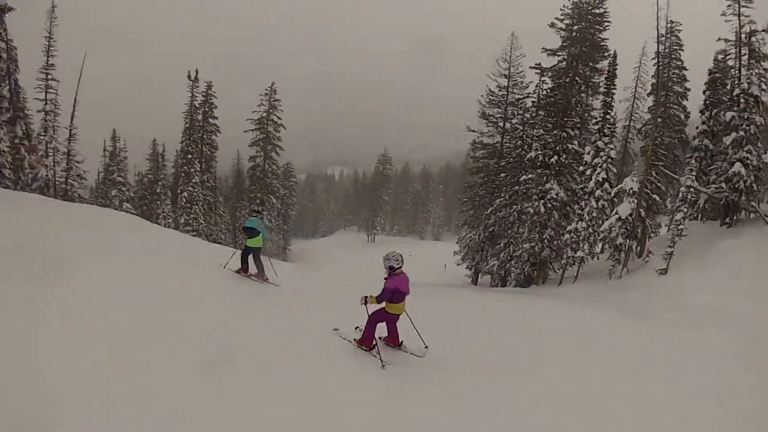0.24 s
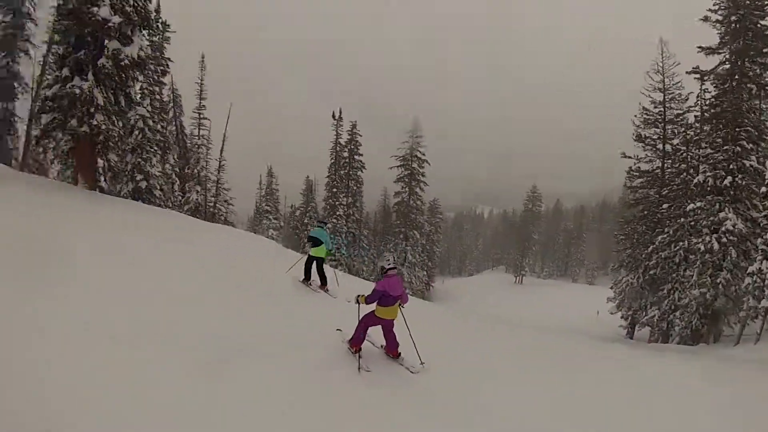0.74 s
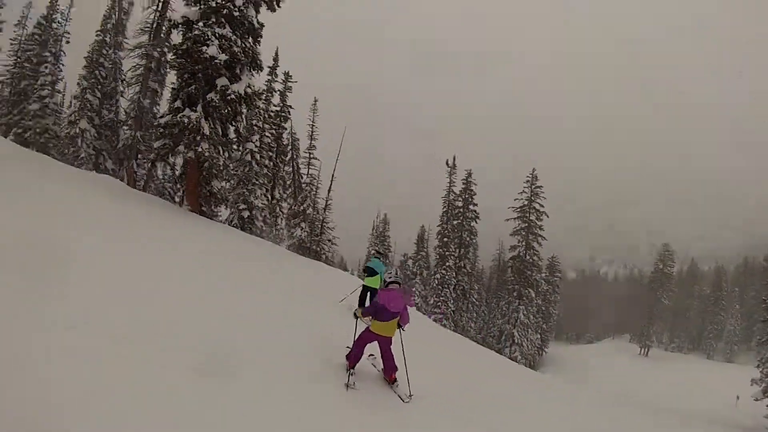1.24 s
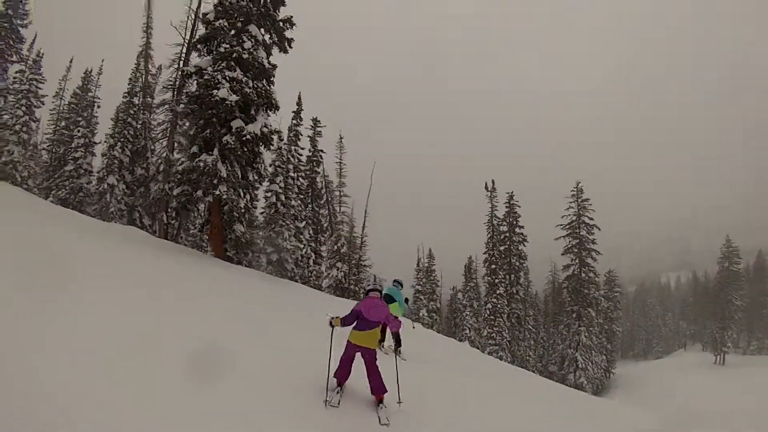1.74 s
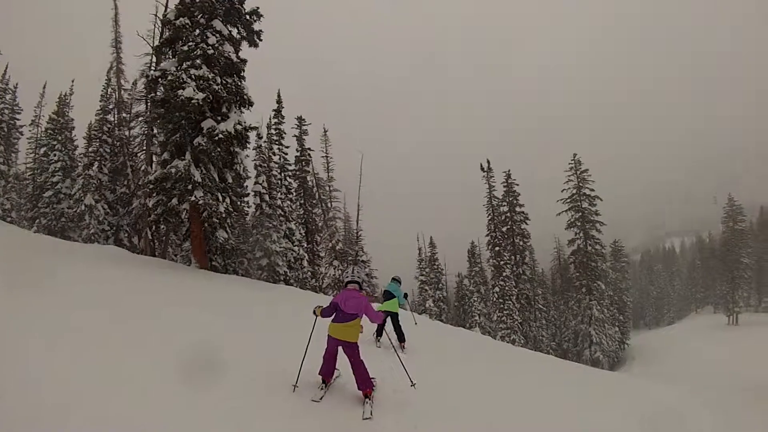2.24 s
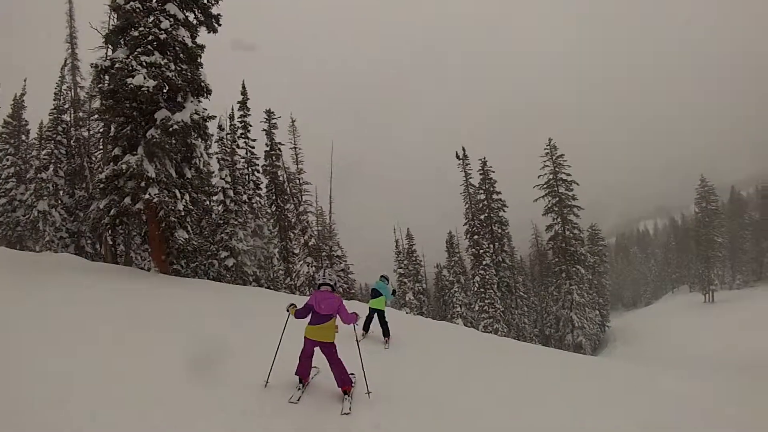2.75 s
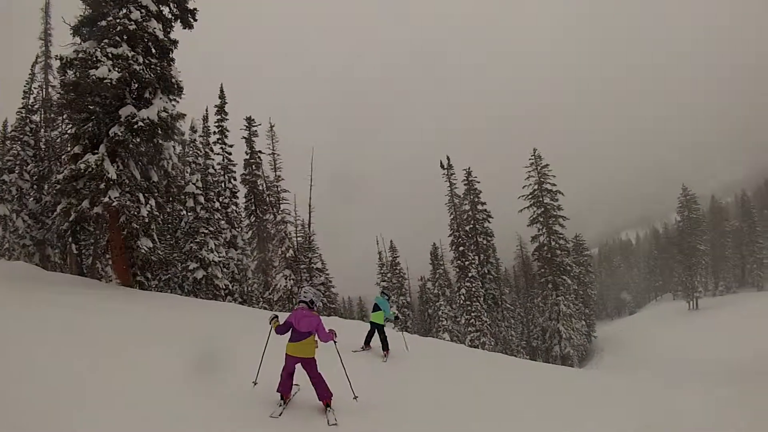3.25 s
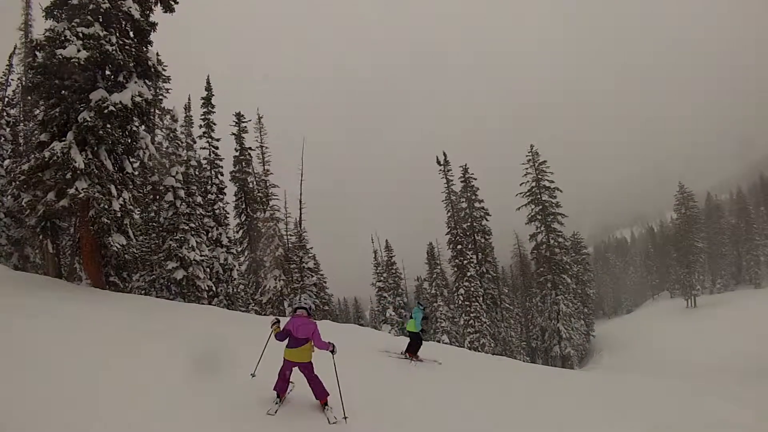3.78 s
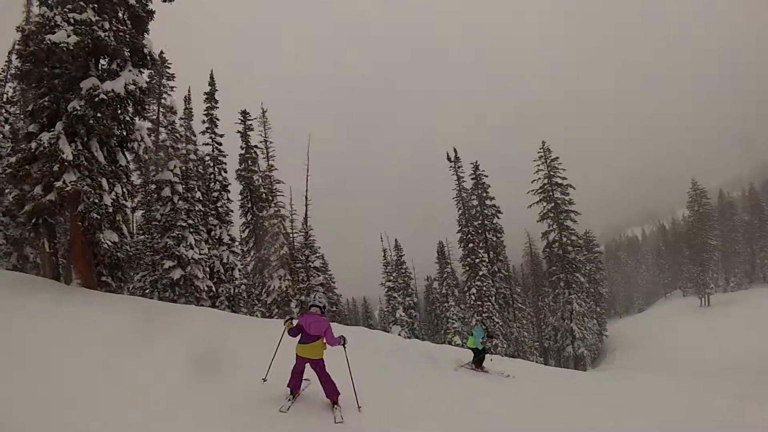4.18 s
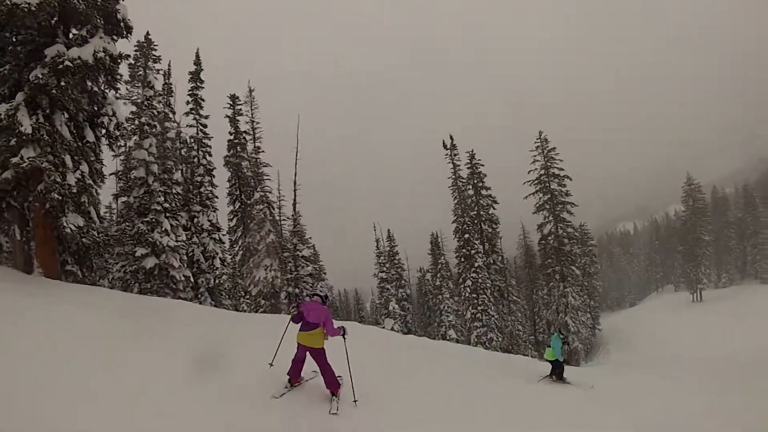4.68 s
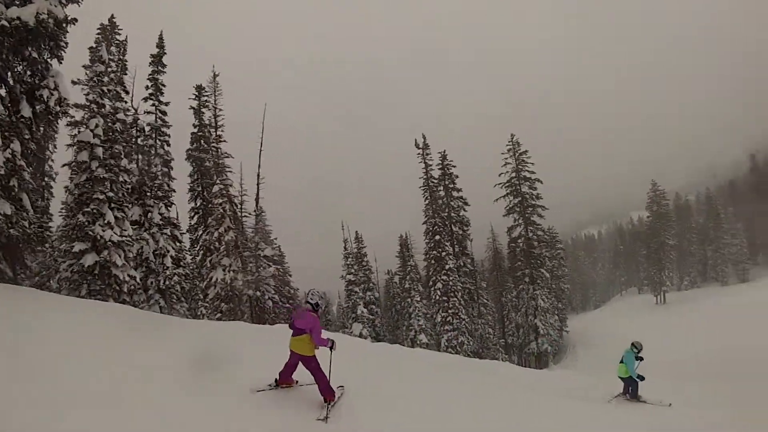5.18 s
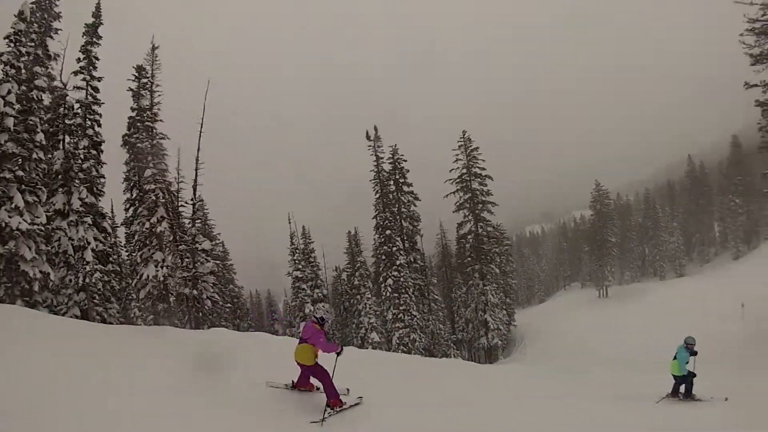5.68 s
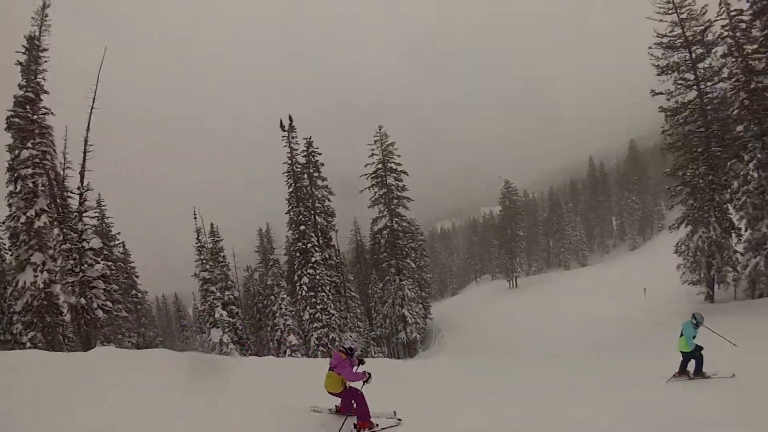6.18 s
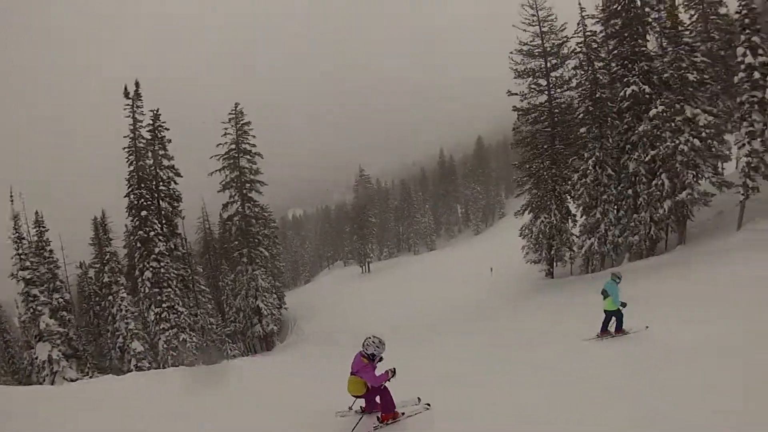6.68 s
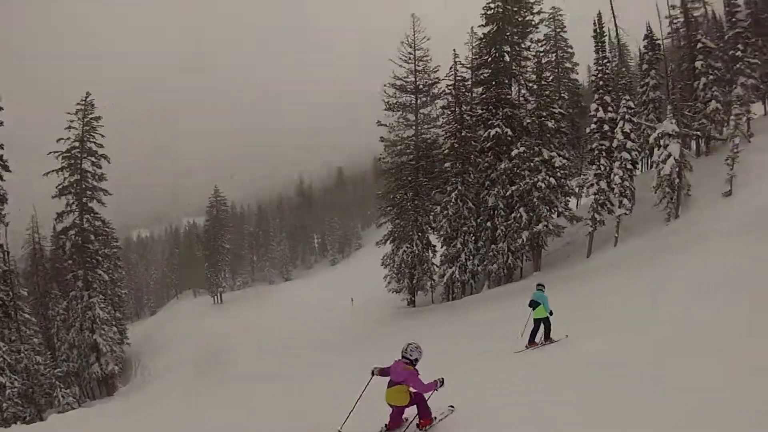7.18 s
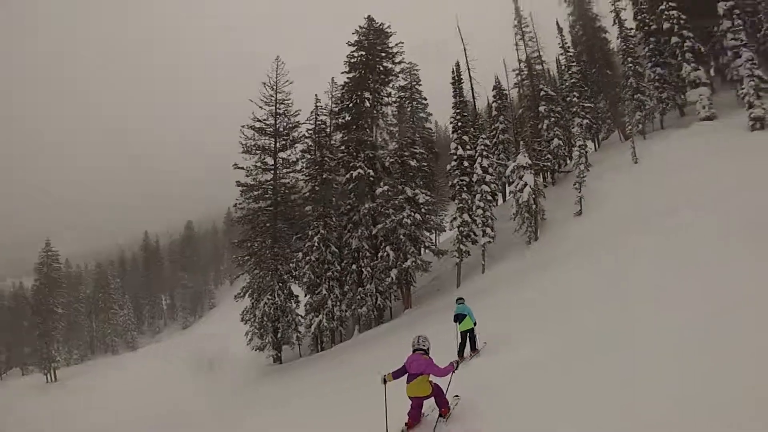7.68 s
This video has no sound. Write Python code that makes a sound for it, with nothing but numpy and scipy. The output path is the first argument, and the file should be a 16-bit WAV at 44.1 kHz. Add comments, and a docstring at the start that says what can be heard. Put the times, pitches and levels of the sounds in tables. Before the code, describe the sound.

Skis swish softly through powder snow in two turns, with sparse icy ticks, dull mount knocks and a low rumble, heard close and muffled.

```python
"""Slow powder skiing in snowfall

Heard close, from a camera in a closed plastic housing: snow sheared by the skis swishes, stronger in two turns,
as noise through the housing's resonances. Short bursts of ringing noise are the crunches of packed snow.
Grains tick and gear clacks by ringing a few modes; the mount knocks dully and its hardest knocks rock the camera.
Low noise makes the rumble of the ride and the air on the shell, over a faint steady hiss."""
import sys
import numpy as np
from scipy import signal
from scipy.fft import rfft, irfft
from scipy.io import wavfile
from scipy.ndimage import uniform_filter1d

SR = 44100
rng = np.random.default_rng(int(sys.argv[2]) if len(sys.argv) > 2 else 0)


def store_pcm(level_fs):
    """Save levels as 16-bit WAV."""
    pcm = np.round(np.clip(level_fs, -1, 1) * 32767).astype(np.int16)
    wavfile.write(sys.argv[1], SR, np.atleast_2d(pcm).T)


N = 349713
TIME = np.arange(N) / SR
FREQS = np.fft.rfftfreq(N, 1 / SR)

# Turns, in which the edges bite and hold; levels before the swish's own law:
# start_s, bite_s, hold_s, release_s, level_db, change over the hold_db
TURNS = [(0.512, 0.059, 0.88, 1, -64.5, -0.5), (7.16, 0.41, 0.35, 0.5, -57, 0.5)]
# Steady glide under the turns, before the swish's own law: time_s, level_db
GLIDE = [(0, -68.3), (2.4, -67), (2.63, -73), (2.8, -68.5), (4.1, -70.5), (5.4, -68.5), (7.1, -65.5)]
# Resonances of the closed housing: pitch_hz, nominal width_hz, level_db
HOUSING = [(1270, 62, -3), (1472, 205, 2), (1629, 120, -1), (1928, 88, -1), (2117, 420, -7),
           (2528, 255, -4), (3670, 56, -6), (4724, 1260, -11), (5350, 370, -12), (6660, 1250, -16.5),
           (8600, 2640, -17.5), (11350, 540, -27)]
# Broad leak through the housing wall: pitch_hz, level_db
WALL = [(100, -11.5), (300, -8.5), (550, -11), (780, -11), (980, -16.5), (1150, -8), (1800, -14.5),
        (2700, -8.5), (3000, -13.5), (5000, -25), (6000, -26.5), (10000, -38), (12800, -25.5), (15000, -42)]
# Resonance rung by thrown spray: pitch_hz, width_hz
SPRAY = (4590, 510)
# Crunches of packed snow under a ski: start_s, relative level_db, nominal length_s
CRUNCHES = [(0.593, -52.5, 0.055), (5.117, -50.5, 0.019), (5.766, -58, 0.016), (5.926, -53, 0.017),
            (6.098, -55, 0.023), (6.73, -52.5, 0.017), (6.763, -61, 0.018), (6.83, -58, 0.028),
            (6.903, -62, 0.03), (6.92, -48, 0.024), (6.958, -56, 0.013), (7.015, -45, 0.0096),
            (7.74, -47.5, 0.027)]
# Icy grains striking the shell: start_s, energy_db, brightest pitch_hz
TICKS = [(0.2183, -33.5, 6000), (0.318, -36, 4500), (1.1755, -34.5, 12000), (1.4109, -25, 5500),
         (1.742, -31.5, 8000), (1.7986, -33.5, 9500), (2.4522, -34, 13000), (2.497, -36.5, 7000),
         (2.5842, -31, 3220), (2.8662, -34.5, 2800), (3.15, -30.5, 3820), (3.3465, -34.5, 7000),
         (4.196, -35.5, 5500), (4.276, -35, 4200), (4.507, -33.5, 3200), (4.542, -34.5, 12000),
         (4.7554, -32, 5900), (4.9789, -32.5, 4500), (5.1217, -31.5, 8000), (5.1356, -17, 4970),
         (5.1987, -22, 3580), (5.3509, -23.5, 9500), (5.4414, -23, 9500), (5.4835, -29, 5500),
         (5.6952, -32, 7600), (5.7269, -28.5, 6000), (5.7552, -32, 4500), (5.819, -29, 9500),
         (5.883, -27, 4400), (6.0278, -27.5, 8000), (6.061, -25, 7500), (6.1546, -24.5, 2150),
         (6.2817, -35.5, 11000), (6.3328, -35.5, 6500), (6.642, -28.5, 2700), (7.0925, -32, 10000),
         (7.234, -33, 9000), (7.3703, -32.5, 7000)]
# Broad shell modes a grain can ring: pitch_hz, nominal width_hz
SHELL_MODES = [(2150, 800), (4450, 1300), (6800, 1250), (11200, 2300)]
# Dull clacks of the ski gear, in short runs: start_s, energy_db
CLACKS = [(1.6232, -32), (1.6733, -32.5), (1.7262, -31), (1.7556, -31), (2.0897, -34), (2.1922, -33.5),
          (3.5685, -30), (3.6682, -30.5), (3.773, -28), (5.3794, -33), (5.3836, -37.5), (5.399, -36),
          (5.4145, -38)]
# Modes rung by a clack: pitch_hz, relative level_db, t60_s
CLACK_MODES = [(1520, -13, 0.022), (1970, -8.5, 0.029), (2250, -9, 0.009), (4370, -0.5, 0.0058),
               (4670, -2.5, 0.0085), (6450, -14, 0.004)]
# Knocks of the camera mount: start_s, peak level_db, contact_s
KNOCKS = [(0.002, -48, 0.0047), (0.41, -40.5, 0.0035), (0.431, -41.5, 0.0021), (0.449, -45, 0.0022),
          (0.521, -38, 0.0043), (0.61, -38, 0.0016), (0.719, -45.5, 0.0029), (0.745, -43, 0.0035),
          (0.829, -39, 0.0033), (0.896, -42.5, 0.0026), (1.665, -42, 0.0043), (1.984, -45.5, 0.0061),
          (2.796, -36.5, 0.0048), (7.147, -35.5, 0.0022)]
# Modes of the camera mount: pitch_hz, relative level_db, t60_s
MOUNT_MODES = [(164, -18, 0.13), (204.5, 1.5, 0.056), (275, -7.5, 0.066), (297.5, -3.5, 0.1),
               (403, -13, 0.14)]
# How hard the ride shakes the camera: time_s, level_db
RIDE = [(0, -52), (0.55, -49), (0.85, -40.5), (1.18, -49), (1.48, -46), (1.7, -50), (2.4, -53.5),
        (3.8, -55.5), (4.3, -55), (5.05, -56.5), (5.3, -53.5), (6.2, -53), (6.45, -56), (6.8, -50),
        (7.38, -48), (7.55, -43), (7.82, -37.5), (7.93, -42)]
# Spectrum of the sway on the mount: pitch_hz, relative level_db per Hz
SWAY_SPECTRUM = [(8, -9), (18, -6), (25, -1), (31, -8), (45, -17), (70, -21), (200, -68)]
# Spectrum of air buffeting the shell: pitch_hz, relative level_db per Hz
BUFFET_SPECTRUM = [(20, 1.5), (45, 0), (70, 0), (100, -8.5), (150, -15.5), (250, -23), (500, -31.5),
                   (1500, -48.5)]
# Spectrum of the hiss shared by both channels: pitch_hz, relative level_db per Hz
HISS_SPECTRUM = [(100, 11), (300, 4.5), (600, 0.5), (1000, -1), (2300, -5.5), (3200, -5), (6800, -7.5),
                 (8000, -9.5), (10200, -10.5), (11200, -7), (12500, -12.5), (15300, -12.5)]
# Spectrum of a very faint noise, opposite in the two channels: pitch_hz, relative level_db per Hz
APART_SPECTRUM = [(35, -52), (60, -16), (155, -17), (195, -4), (282, 0), (982, 1.5), (1180, -2),
                  (1490, -17), (1790, -8.5), (2260, -8.5), (3190, 0), (7680, 0), (10100, 0), (15000, -10)]


def swish(level_db=2.5, rest_db=-71, flutter_db=1.33, flutter_hz=32, lumps_db=1.11, lumps_hz=4,
          spray_db=-11, spray_from_db=-56):
    """The skis shear powder, fluttering over lumps, heard through the housing; hard edging adds bright spray."""
    hz = np.fft.rfftfreq(4096, 1 / SR)
    fluttering = shear() * gain_of(flutter_db * wander(flutter_hz))
    slide = evened(signal.oaconvolve(fluttering, causal(housing(hz)))[:N])
    push = edging() * gain_of(lumps_db * wander(lumps_hz))
    spray = gain_of(spray_db) * push / gain_of(spray_from_db) * ringing(*SPRAY)
    # at a gentle glide the powder gives way almost without sound
    loudness = push ** 2 / np.hypot(push, gain_of(rest_db))
    return gain_of(level_db) * (slide + spray) * loudness


def edging():
    """How hard the skis shear the snow, over the glide: each turn swells and holds; the first eases slightly
    and fades, the last grows slightly and is still sounding at the end."""
    power = gain_of(curve(GLIDE, order=1)) ** 2
    for start, bite, hold, release, db, change_db in TURNS:
        corners = start + np.cumsum([0, bite, hold, release])
        shape = np.interp(TIME, corners, [0, 1, gain_of(change_db), 0])
        power = power + (gain_of(db) * shape) ** 2
    return np.sqrt(power)


def shear(grains_per_s=800, grain_spread_db=3.5):
    """Snow giving way under a ski: equal parts of smooth hiss and grains of breaking clumps, rms 1."""
    grains = (rng.random(N) < grains_per_s / SR) * rng.choice([-1, 1], N)
    grains = grains * gain_of(grain_spread_db * np.minimum(rng.exponential(1, N), 4))
    return evened(rng.standard_normal(N) + evened(grains))


def ringing(hz, width):
    """Rough shearing noise in one resonance, rms 1."""
    resonance = 1 / (1 + ((FREQS - hz) / (0.5 * width)) ** 2)
    return evened(irfft(rfft(shear()) * resonance, N))


def housing(hz):
    """Gain of the closed housing: its resonances add in power to the wall's broad leak."""
    peaks = 0
    for f, width, db in HOUSING:
        peaks = peaks + gain_of(db) ** 2 / (1 + ((hz - f) / (0.43 * width)) ** 2) ** 2
    return np.sqrt(peaks + gain_of(read(WALL, hz)) ** 2)


def crunches(level_db=-5, upper_db=-15, small_db=-60, spread_db=3, packed_s=5.4, packed_spread_s=0.7,
             small_s=0.0062, count=18):
    """Snow packs in short rough bursts of low body and thin upper ring; small ones gather before the last turn."""
    small = []
    for when, size in rng.standard_normal((count, 2)):
        small.append((packed_s + packed_spread_s * when, small_db + spread_db * size, small_s))
    swell = np.zeros(N)
    for s, db, length in CRUNCHES + small:
        u = TIME[:SR // 4] / max(length / 3, .002)  # 1 at the burst's peak
        add(swell, s, gain_of(db) * u * np.exp(1 - u))
    body = ringing(1494, 285)
    upper = ringing(3530, 120)
    return gain_of(level_db) * swell * (body + gain_of(upper_db) * upper)


def snowfall(faint_db=-46, spread_db=2.5, soft_hz=6000, hard_hz=20000, count=190):
    """Larger grains strike the shell one by one, among a scatter of faint ones of every hardness."""
    out = np.zeros(N)
    for s, db, bright_hz in TICKS:
        add(out, s, tick(shares(db, bright_hz)))
    for when, size, hardness in rng.random((count, 3)):
        db = faint_db + spread_db * min(-np.log(size), 3)
        bright_hz = soft_hz * (hard_hz / soft_hz) ** hardness
        add(out, when * N / SR, tick(shares(db, bright_hz, landing_db=9)))
    return out


def tick(mode_db, detune=0.045, scatter_s=0.00035, tail_db=-19, tail_s=0.0095):
    """One grain crumbles on the shell, a sharp noise burst with a faint tail, and rings slightly detuned modes."""
    hz, t = np.fft.rfftfreq(1024, 1 / SR), TIME[:1024]
    power = 0
    shifts = 1 + detune * rng.uniform(-1, 1, len(SHELL_MODES))
    for (f, width), db, shift in zip(SHELL_MODES, mode_db, shifts):
        shape = (1 + ((hz ** 2 - (f * shift) ** 2) / (width * (hz + 1))) ** 2) ** -1.7
        power = power + gain_of(db) ** 2 * shape / shape.mean()
    contact = t / scatter_s * np.exp(1 - t / scatter_s) + gain_of(tail_db) * np.exp(-t / tail_s)
    crumble = rng.standard_normal(len(t)) * contact
    sound = signal.fftconvolve(crumble[:len(t) // 2], causal(np.sqrt(power)))
    return sound * np.sqrt(power.mean() / np.sum(sound ** 2))


def shares(db, bright_hz, landing_db=2.5, rise_db_per_octave=3.5, at_hz=8300, fall_db_per_octave=7.5):
    """A grain's energy favours modes near its brightest pitch, varied by where it happens to land."""
    octaves = np.log2(np.array(SHELL_MODES)[:, 0] / bright_hz)
    landing = rng.uniform(-1, 1, len(SHELL_MODES))
    # harder grains stir the low modes less, up to a limit
    rise = rise_db_per_octave * min(bright_hz / at_hz, 1)
    mode_db = np.minimum(rise * octaves, -fall_db_per_octave * octaves) + landing_db * landing
    return db + mode_db - 10 * np.log10(np.sum(gain_of(mode_db) ** 2))


def clacks(detune=0.015, bite_s=0.00011):
    """Skis and poles clack softly: the same decaying modes each time, slightly detuned."""
    t, out = TIME[:SR // 20], np.zeros(N)
    chances = rng.standard_normal((len(CLACKS), len(CLACK_MODES)))
    for (s, db), chance in zip(CLACKS, chances):
        ring = 0
        for (f, d, t60), k in zip(CLACK_MODES, chance):
            cycles = f * (1 + detune * k) * t + k
            ring = ring + gain_of(d - 60 * t / t60) * np.sin(2 * np.pi * cycles)
        ring = ring * (1 - np.exp(-t / bite_s))
        add(out, s, gain_of(db) * ring / np.linalg.norm(ring))
    return out


def knocks(detune=0.012, low_hz=150):
    """The mount shifts in its joint: a soft push rings its low modes."""
    t, out = TIME[:SR // 5], np.zeros(N)
    chances = rng.standard_normal((len(KNOCKS), len(MOUNT_MODES)))
    for (s, db, contact), chance in zip(KNOCKS, chances):
        ring = 0
        for (f, d, t60), k in zip(MOUNT_MODES, chance):
            ring = ring + gain_of(d - 60 * t / t60) * np.sin(2 * np.pi * f * (1 + detune * k) * t)
        push = np.sin(np.pi * np.minimum(t / max(contact, .0005), 1)) ** 2
        pushed = signal.fftconvolve(ring, push)[:len(t)]
        # the small shell radiates little below its lowest mode
        sound = signal.lfilter(*signal.butter(2, low_hz, "high", fs=SR), pushed)
        add(out, s, -gain_of(db) * sound / abs(sound).max())
    return out


def jolts(level_db=-5, rock_hz=29, rock_s=0.017, hard_db=-38.0):
    """The hardest knocks set the camera rocking for a cycle or two."""
    t, out = TIME[:SR // 4], np.zeros(N)
    swell = t / rock_s * np.exp(1 - t / rock_s)
    for s, db, _ in KNOCKS:
        if db > hard_db:
            add(out, s, gain_of(db + level_db) * swell * np.cos(2 * np.pi * rock_hz * t))
    return out


def rumble(buffet_db=-59, usual_db=-51, buffet_share=0.33, steadiness=0.26, bumps_db=0.5, bumps_hz=5,
           gusts_db=1.5, gusts_hz=8):
    """The camera sways on its mount over bumps; air buffets the shell, rising less steeply with the ride."""
    sway = noise(SWAY_SPECTRUM)
    # partly level out the sway's own swells
    local_power = abs(uniform_filter1d(sway ** 2, size=4000))
    sway = evened(sway / local_power ** (steadiness / 2))
    ride = curve(RIDE, order=1)
    air = noise(BUFFET_SPECTRUM)
    air_db = buffet_db + buffet_share * (ride - usual_db) + gusts_db * wander(gusts_hz)
    return sway * gain_of(ride + bumps_db * wander(bumps_hz)) + air * gain_of(air_db)


def noise(points):
    """Steady noise of a given spectrum, rms 1."""
    return evened(irfft(rfft(rng.standard_normal(N)) * gain_of(read(points, FREQS)), N))


def wander(hz):
    """Slow chance, rms 1, mostly below a given rate."""
    return evened(irfft(rfft(rng.standard_normal(N)) / (1 + (FREQS / hz) ** 4), N))


def causal(gain):
    """Minimum-phase impulse response, with a sharp start, for a one-sided gain."""
    log_gain = np.log(np.maximum(np.r_[gain, gain[-2:0:-1]], 1e-5))
    return np.fft.ifft(np.exp(np.conj(signal.hilbert(log_gain)))).real


def gain_of(db):
    """Decibels to gain."""
    return 10 ** (np.asarray(db) / 20)


def evened(x):
    """Scales to rms 1."""
    return x / np.sqrt(np.mean(x ** 2) + 1e-20)


def read(points, hz):
    """A spectrum in dB, joined on a log-frequency axis."""
    f, value = np.transpose(points)
    return np.interp(np.log(hz + 1), np.log(f + 1), value)


def curve(rows, order):
    """One column of a control table at every sample."""
    rows = np.array(rows)
    return np.interp(TIME, rows[:, 0], rows[:, order])


def add(mix, s, sound):
    """Mixes a sound in at time s."""
    part = mix[max(round(s * SR), 0):][:len(sound)]
    part += sound[:len(part)]


def scene(hiss_db=-66.5, apart_db=-78):
    """Both channels carry the same sound, plus a very faint noise of opposite sign."""
    snow = swish() + crunches() + snowfall()
    gear = clacks() + knocks() + jolts()
    middle = snow + gear + rumble() + gain_of(hiss_db) * noise(HISS_SPECTRUM)
    side = gain_of(apart_db) * noise(APART_SPECTRUM)
    return np.array([middle + side, middle - side])


def record(dry, edge_hz=15450):
    """The recorder's band limit, a steep linear-phase low-pass."""
    low_pass = signal.firwin(511, edge_hz, window=("kaiser", 9), fs=SR)
    return signal.oaconvolve(dry, low_pass[None], "same")


dry = scene()
out = record(dry)
store_pcm(out)
```